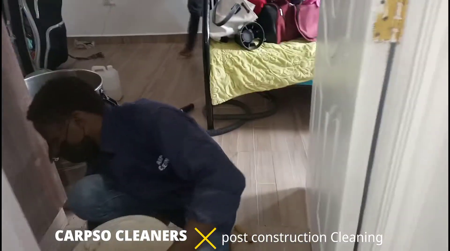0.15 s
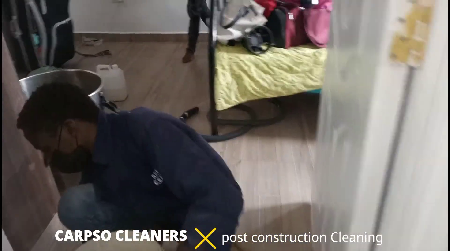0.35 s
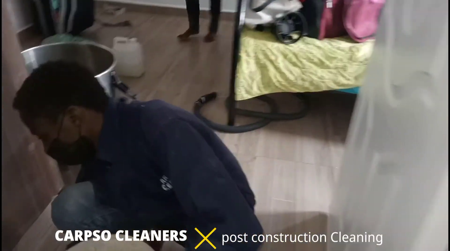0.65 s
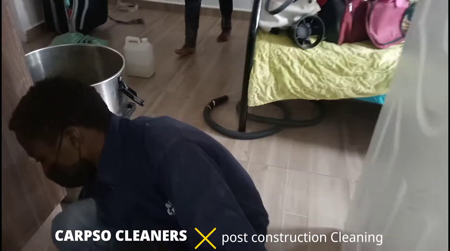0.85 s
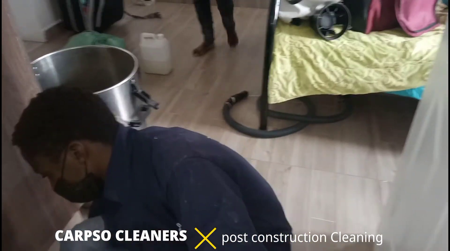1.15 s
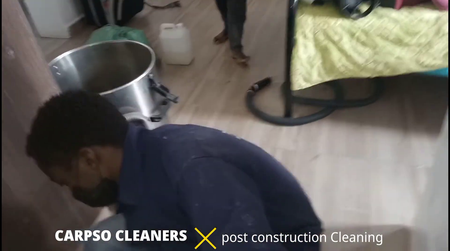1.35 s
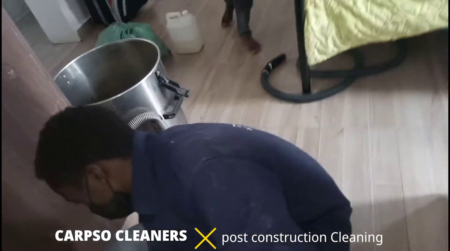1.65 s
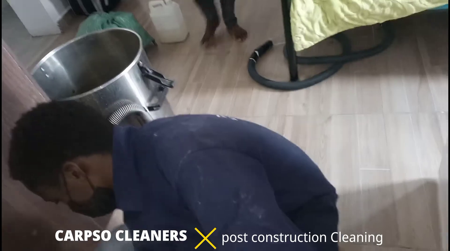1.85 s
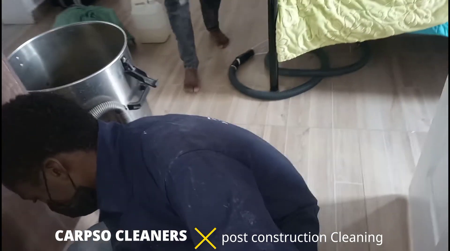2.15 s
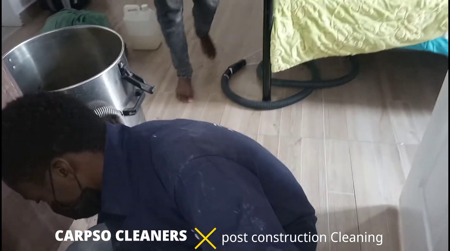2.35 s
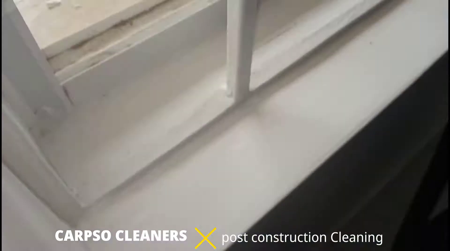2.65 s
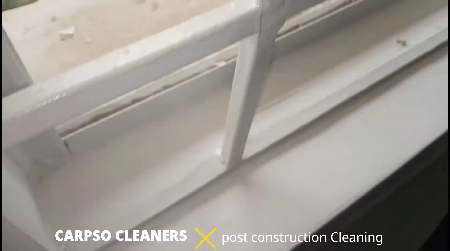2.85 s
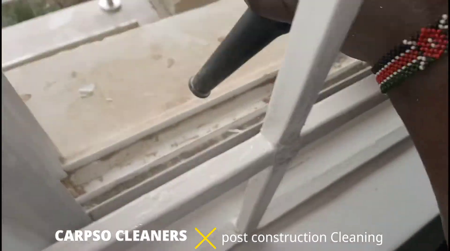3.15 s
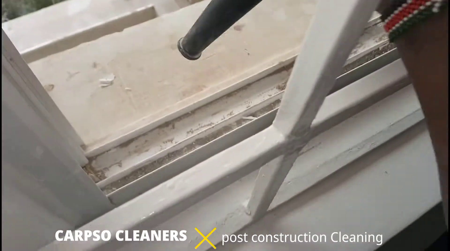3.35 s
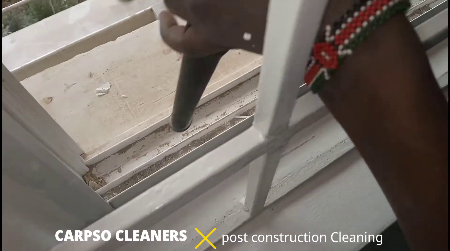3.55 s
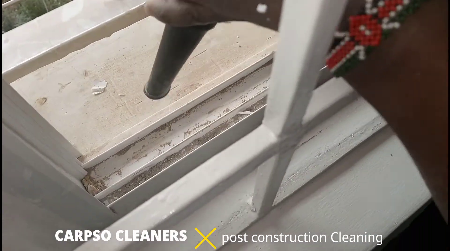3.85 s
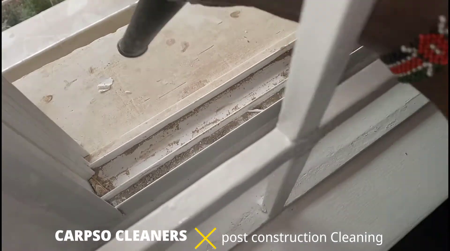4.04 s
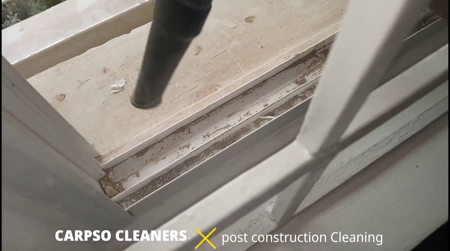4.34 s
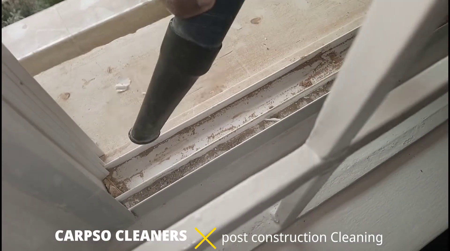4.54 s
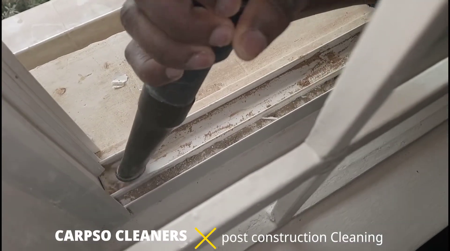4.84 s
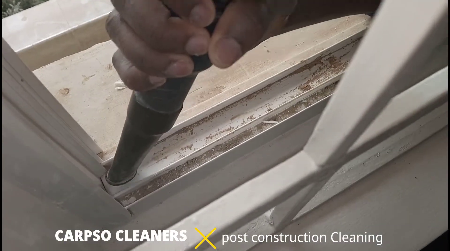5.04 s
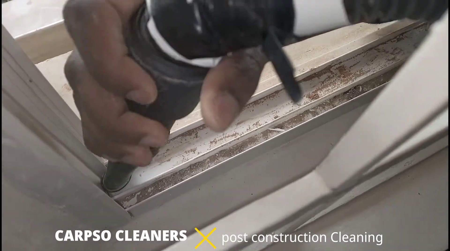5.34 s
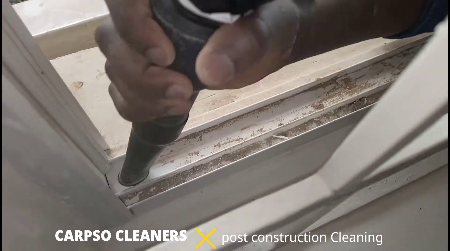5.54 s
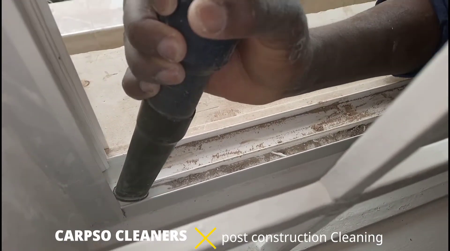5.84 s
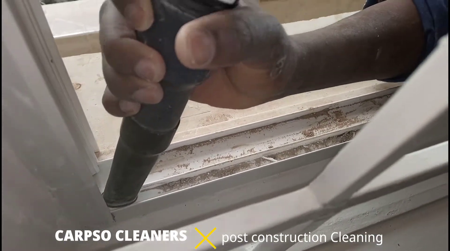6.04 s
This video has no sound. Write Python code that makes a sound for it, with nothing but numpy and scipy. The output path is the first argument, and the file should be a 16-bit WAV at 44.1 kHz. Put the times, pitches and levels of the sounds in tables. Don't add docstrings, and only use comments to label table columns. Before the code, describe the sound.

Faint scrubbing in a hard tiled room, with distant bustle and dull knocks, becomes busier before stopping abruptly. A twin-motor vacuum quickly fades in close by, humming and roaring with rushing air. A bright tick of grit, then a gliding hiss as the nozzle closes on the sill. Pressed into the groove it shrieks airily and the motor sound sinks, then recovers as the seal loosens, before hissing up again.

```python
import sys
import numpy as np
from scipy import signal
from scipy.fft import rfft, irfft
from scipy.io import wavfile
from scipy.ndimage import uniform_filter1d, map_coordinates

SR = 44100
rng = np.random.default_rng(int(sys.argv[2]) if len(sys.argv) > 2 else 0)


def level_to_linear(level):
    exponent = np.asarray(level, float) / 20
    return 10 ** exponent


def inscribe(sig):
    pcm = np.round(np.clip(np.atleast_2d(sig).T, -1, 1) * 32767)
    wavfile.write(sys.argv[1], SR, pcm.astype(np.int16))


N = 272979
T = np.arange(N) / SR
FRAME = 2048
TOP_HZ = 15550


def unit(x):
    return x / np.sqrt(np.mean(x ** 2) + 1e-20)


def curves(rows):
    s, *cols = np.transpose(rows)
    return [np.interp(T, s, c) for c in cols]


def along(points):
    f, level_db = np.transpose(points)
    return lambda hz, s: level_to_linear(np.interp(np.log(hz + 1), np.log(f + 1), level_db))


def bump(hz, centre_hz, width_hz):
    return 1 / (1 + ((hz - centre_hz) / width_hz) ** 2) ** 2


def resonances(hz, modes):
    return sum(level_to_linear(db) * bump(hz, c, w) for c, w, db in modes)


def swell(t, s, length, rise, fall):
    return np.clip((t - s) / rise, 0, 1) * np.exp(-np.clip(t - s - length, 0, None) / fall)


def noise(shape, patchy_db, top_hz=TOP_HZ):
    hz, s, z = signal.stft(rng.standard_normal(N), SR, nperseg=FRAME)
    field = uniform_filter1d(rng.standard_normal(z.shape), size=8, axis=0)
    field = uniform_filter1d(field, size=2, axis=1)
    gain = shape(hz[:, None], s) * level_to_linear(patchy_db * unit(field)) * (hz < top_hz)[:, None]
    return unit(signal.istft(z * gain, SR, nperseg=FRAME)[1][:N])


def wobble(rate):
    return map_coordinates(rng.standard_normal(int(N * rate / SR) + 4), [T * rate])


def ring(s, level_db, hz, t60):
    t = np.clip(T - s, 0, None)
    return level_to_linear(level_db - 60 * t / t60) * np.sin(2 * np.pi * hz * t) * (1 - np.exp(-40 * t / t60))


def narrow(rows, spread_hz, edge_s):
    def gains(t):
        return [level_to_linear(db) * swell(t, s, length, edge_s, edge_s / 2) for s, length, *_, db in rows]

    def shape(hz, t):
        return sum(g * bump(hz, c + glide * (t - s), spread_hz)
                   for g, (s, _, c, glide, _) in zip(gains(t), rows))

    level = np.sqrt(np.mean(np.sum(np.square(gains(T[::64])), axis=0)))
    return level * noise(shape, patchy_db=2.5)


# start_s, speed_turns_per_s
SPEED = [(2.7, 283.0), (2.88, 283.6), (3.0, 284.8), (3.12, 285.3), (3.5, 286.8), (3.62, 286.7),
         (3.75, 284.8), (3.9, 284.0), (4.4, 284.7), (5.1, 286.0), (5.75, 287.7), (6.19, 287.0)]
# start_s, lead_turns_per_s
LEAD = [(2.7, 1.608), (3.3, 4.583), (3.9, 5.978), (6.19, 6.01)]
# shaft_multiple, level_db
ORDERS_A = [(1, -1.5), (2, -18), (4, -18)]
ORDERS_B = [(1, -2), (1.5, -21), (2, -20), (4, -27)]
# start_s, first_db, second_db
BLADES = [(2.72, -34, -38), (3.06, -33.5, -37), (3.3, -34.5, -35), (3.6, -34.5, -47), (3.9, -32.5, -35),
          (4.25, -31, -43), (4.42, -32, -34), (4.8, -34, -36), (4.97, -31, -42), (5.05, -35.5, -50),
          (5.69, -31, -38), (5.9, -30, -33), (6.19, -29.5, -31)]
# pitch_hz, level_db
CASING = [(15, -75), (25, -45), (53, -47), (107, -18), (229, -10), (257, -13.5), (284, -4), (309, -2.5),
          (346, -6.5), (569, -11.5), (741, -26), (1070, -15), (1300, -10.5), (1690, -56), (2860, -120)]
# pitch_hz, width_hz, over_roar_db
CASING_MODES = [(119.5, 16.8, 8.5), (187, 16.2, 6.5), (260, 13.5, 7), (442, 13.4, 5.5), (574, 13, 6)]
# start_s, seal_0_to_1, low_whistle_tilt_db
SEAL = [(4.9, 0, 8.5), (4.99, 0.33, -1.5), (5.05, 0.44, -1), (5.16, 0.62, -3), (5.25, 0.83, 1.5),
        (5.35, 0.93, -0.3), (5.45, 0.88, -3.5), (5.56, 0.84, -0.9), (5.62, 0.63, 1), (5.69, 0.12, 0.5),
        (6.0, 0.32, -1.5), (6.19, 0.6, -0.9)]
DUCKED_DB = dict(roar=14.5, hum=12, blade_a=6, blade_b=14, duct=4, rush=1.5)


def motors():
    hum_db, roar_db = -29, -36.5 + 4.5
    seal = curves(SEAL)[0]
    first = np.cumsum(curves(SPEED)[0]) / SR
    ahead = .5 + np.cumsum(curves(LEAD)[0] * (T > LEAD[0][0])) / SR
    second = first + ahead

    def tone(turns, k, level_db):
        phase = 2 * np.pi * k * turns + .06 * k * wobble(8)
        return np.sqrt(2) * level_to_linear(level_db + 1.1 * wobble(12)) * np.sin(phase)

    def drum(hz, t):
        return along(CASING)(hz, t) * (1 + resonances(hz, CASING_MODES))

    hum = sum(tone(first, k, db) for k, db in ORDERS_A)
    hum += sum(tone(second, k, db) for k, db in ORDERS_B)
    blade_a_db, blade_b_db = curves(BLADES)
    blades = tone(first, 6, blade_a_db - DUCKED_DB["blade_a"] * seal)
    blades += tone(second, 6, blade_b_db - DUCKED_DB["blade_b"] * seal - 1.3 * wobble(9))
    roar = level_to_linear(roar_db - DUCKED_DB["roar"] * seal) * noise(drum, patchy_db=1.5)
    return level_to_linear(hum_db - DUCKED_DB["hum"] * seal) * hum + blades + roar


# pitch_hz, level_db
DUCT = [(290, -22), (500, -9), (570, -4), (733, -6.5), (1460, -5.5), (1720, -7), (1900, -11.5), (3500, -10),
        (4550, -10), (7700, -120)]
RUSH = [(1060, -26.5), (1800, -3.5), (1840, -2), (2830, -7), (3320, -2.5), (3720, -15), (4150, -5.5),
        (6470, 0), (7810, -12), (9000, -14), (11700, -28), (19800, -120)]
FIZZ = [(4120, -43), (7000, -1), (8040, -11.5), (9220, -3.5), (10200, -4.5), (13400, -16), (14700, -6.5),
        (15400, -6.5)]
# start_s, length_s, pitch_hz, glide_hz_per_s, level_db
GAP = [
    (2.7, 1.3, 4530, -250, -41),
    (4.05, 0.78, 4100, 2249, -28.5),
    (5.7, .6, 4140, 2650, -25),
]
# start_s, length_s, pitch_hz, glide_hz_per_s, level_db
WHISTLES = [(5.06, .14, 6150, 300, -29), (5.1, .1, 4040, -200, -30), (5.19, .1, 4010, -40, -21),
            (5.21, .37, 3300, -220, -25), (5.33, .22, 6500, 900, -25), (5.37, .22, 4380, -1100, -27),
            (5.76, .5, 6530, 150, -29)]
# pitch_hz, width_hz, level_db
GROOVE_MODES = [
    [(3540, 660, -5.5), (4110, 960, 5.5)],
    [(6220, 1600, -5.5), (6790, 1100, -2.5), (8630, 950, -11.5)],
]


def suction():
    near_from_s, nearest_s = 3.73, 4.7
    seal, tilt_db = curves(SEAL)
    gust_db = 0.45 * wobble(14)

    duct_db = -36 + 3.0 + 2.5 * np.maximum(T - near_from_s, 0) + 1.3 * wobble(7)
    duct_db -= (DUCKED_DB["duct"] + .8 * tilt_db) * seal
    rush_db = -32 + 8.5 - DUCKED_DB["rush"] * seal + gust_db
    nearing_s = np.clip(T, near_from_s, nearest_s) - near_from_s
    fizz_db = -34 + 6.5 * seal + 1.7 * nearing_s + gust_db + 0.78 * wobble(9)

    air = level_to_linear(duct_db) * noise(along(DUCT), patchy_db=1.0)
    air += level_to_linear(rush_db) * noise(along(RUSH), patchy_db=1.83)
    air += level_to_linear(fizz_db) * noise(along(FIZZ), patchy_db=2.6)
    air += narrow(GAP, spread_hz=990, edge_s=.15)
    air += narrow(WHISTLES, spread_hz=120, edge_s=0.036)

    groove_db = -39 + 20.5 * np.sqrt(np.clip(seal, 0, 1))
    for level_db, modes in zip((groove_db + tilt_db, groove_db - tilt_db), GROOVE_MODES):
        whistle = noise(lambda hz, t: resonances(hz, modes), patchy_db=1.9)
        air += level_to_linear(level_db + 1.15 * wobble(60)) * whistle
    return air


# start_s, crack_db, t60_s
SNAP = (3.0068, -10, .006)
# pitch_hz, level_db
SNAP_MODES = [(4600, -12), (6500, -6), (8000, -10), (11000, -19), (14500, -12)]
# centre_s, peak_db, pitch_hz, half_width_s
BUMP = (4.9661, -13.5, 310, .0012)


def knocks():
    s, crack_db, t60 = SNAP
    decay = (T >= s) * level_to_linear(crack_db - 60 * np.clip(T - s, 0, 1) / t60)
    crack = decay * noise(lambda hz, t: hz > 1500, patchy_db=1, top_hz=16200)
    snap = crack + sum(ring(s, db, hz, t60) for hz, db in SNAP_MODES)
    s, push_db, hz, width = BUMP
    push = np.sin(2 * np.pi * hz * (T - s)) * np.exp(-((T - s) / width) ** 2 / 2)
    return snap + level_to_linear(push_db) * push


# start_s, bristle_db, wash_db, rise_s, fall_s
SCUFF = (1.732, -47, -53, .012, .045)


def scuff():
    s, _, _, rise, fall = SCUFF
    return swell(T, s, rise, rise, fall)


# start_s, length_s, end_db, top_over_bristle_db
STROKES = [(-.05, 0.096, -60, -15), (0.107, 0.11, -57.5, -3), (0.334, 0.042, -68, -14),
           (0.495, 0.13, -59.5, -6), (0.69, 0.088, -60.5, -5), (0.834, 0.088, -57, -3),
           (0.984, 0.066, -61.5, -5), (1.09, 0.061, -59, 1), (1.128, 0.21, -53, -8.5),
           (1.474, 0.2, -49.5, -5), (1.753, .08, -56, -6), (1.862, .085, -49.5, -8.5),
           (1.965, .09, -49.5, -7), (2.035, 0.43, -46, -7), (2.51, .1, -48, -3), (2.624, .1, -46.5, 0)]
# pitch_hz, level_db
BRISTLE = [(1470, -19.5), (2500, -18), (3670, -6), (4470, -2.5), (5470, 0), (8020, -7), (10000, -12.5),
           (13000, -31), (22000, -120)]
BRISTLE_TOP = [(4710, -42), (8000, -22), (9890, -2.5), (13400, -11), (13800, -10), (14800, 1.5), (15400, 2)]


def scrubbing():
    rise_share, fall_s, swell_db_per_s = 0.49, 0.051, 9
    rest_db, rest_top_db = -69, -11
    bristle = level_to_linear(rest_db) + level_to_linear(SCUFF[1]) * scuff()
    top = level_to_linear(rest_db + rest_top_db)
    for s, length, end_db, top_db in STROKES:
        press = level_to_linear(end_db + swell_db_per_s * np.clip(T - s - length, -1, 0))
        press = press * swell(T, s, length, rise_share * length, fall_s)
        bristle = bristle + press
        top = top + level_to_linear(top_db) * press
    brush = bristle * noise(along(BRISTLE), patchy_db=3.0)
    brush += top * noise(along(BRISTLE_TOP), patchy_db=-1.0)
    return level_to_linear(0.89 * wobble(30.3)) * brush


# start_s, level_db
HOUSE = [(0, -62), (.28, -63), (.39, -58), (.9, -61.5), (1.15, -61.5), (1.45, -61.5), (1.52, -58.5),
         (1.95, -56), (2.36, -45), (2.68, -48)]
# peak_s, level_db
STEPS = [(.17, -71), (.3, -67), (.39, -66), (.48, -72), (.62, -73), (.74, -70), (.85, -70), (1.02, -73),
         (1.12, -70), (1.24, -62), (1.38, -69), (1.68, -66), (1.9, -72), (2.05, -72), (2.4, -78)]
# start_s, length_s, level_db
BOOMS = [(.17, .06, -79), (0.297, 0.28, -70), (.7, 0.11, -78), (0.974, 0.25, -75), (1.36, 0.099, -83),
         (1.957, 0.17, -64), (2.152, 0.2, -60.5), (2.31, .14, -55), (2.454, 0.17, -59.5)]
# pitch_hz, level_db
WASH = [(470, -59), (960, -25), (1170, -5), (1310, -4.5), (1520, -4), (2320, -1.5), (2670, -2),
        (5000, -8.5), (6500, -47), (11000, -120)]
RUMBLE = [(15, -47), (25, -7), (59, -1), (146, 1), (229, -14), (291, -13), (413, -26), (450, -12),
          (580, -48), (990, -120)]
BOOM = [(150, -38), (250, -10), (334, -3), (443, -18), (614, -2.5), (743, -11.5), (893, 1.5), (1200, -4),
        (1560, -31), (2640, -120)]
# start_s, length_s, pitch_hz, glide_hz_per_s, level_db
HOLLOW = [(1.05, .18, 316, 52, -65.5), (1.34, .08, 335, 10, -74), (1.47, .26, 338, 70, -67.5),
          (1.76, 0.25, 362, 120, -67)]
# start_s, length_s, pitch_hz, glide_hz_per_s, level_db
FAR_WHINE = [
    (-.05, 0.46, 1983, -10, -65.5),
    (.42, .2, 1960, -10, -77),
]
# start_s, level_db, pitch_hz, t60_s
THUDS = [(1.21, -53, 196, 0.21), (1.83, -60, 583, 0.36), (1.869, -56, 140, 0.49), (2.33, -52, 231, 0.52),
         (2.34, -51.5, 600, 0.54)]


def house():
    step_s, boom_rise_s, boom_fall_s = 0.056, 0.034, 0.066
    wash = level_to_linear(curves(HOUSE)[0]) + level_to_linear(SCUFF[2]) * scuff()
    rumble = level_to_linear(-79) + sum(level_to_linear(db) * np.exp(-((T - s) / step_s) ** 2) for s, db in STEPS)
    boom = level_to_linear(-85) + sum(level_to_linear(db) * swell(T, s, length, boom_rise_s, boom_fall_s)
                          for s, length, db in BOOMS)
    room = wash * noise(along(WASH), patchy_db=1.5)
    room += rumble * noise(along(RUMBLE), patchy_db=4.0)
    room += boom * noise(along(BOOM), patchy_db=2.5)
    room += narrow(HOLLOW, spread_hz=37, edge_s=0.051)
    room += narrow(FAR_WHINE, spread_hz=21, edge_s=.04)
    return room + sum(ring(*hit) for hit in THUDS)


# silence_from_s, fade_from_s, fade_to_s
CUT = (2.685, 2.708, 3.0)
# start_s, gain_db
DUCK = [
    (2.985, 0),
    (3.003, -10),
    (3.025, -9.5),
    (3.05, 0),
]
# start_s, gain_db
PUMP = [(4.95, 0.5), (4.99, 1.8), (5.04, -0.5), (5.1, 0.5), (5.55, 1), (5.6, -2.5), (5.66, 0.5),
        (5.72, 1.5), (5.85, -0.4)]


def scene():
    stop, start, full = CUT
    fade = 0.93 * np.clip((T - start) / (full - start), 0, 1)
    fade += 0.062 * np.clip((T - start) / 0.0011, 0, 1)
    gain = level_to_linear(curves(DUCK)[0] + curves(PUMP)[0]) * fade
    vacuum = (motors() + suction()) * gain
    before = (scrubbing() + house()) * np.clip((stop - T) / .001, 0, 1)
    mono = before + vacuum + knocks()
    return np.array([mono, mono])


# centre_s, centre_hz
SPLITS = [(.403, 9900), (2.47, 7200), (2.515, 6900), (2.515, 11800), (3.12, 6200), (3.353, 12800),
          (3.376, 11800), (3.376, 4900), (3.468, 4600), (3.468, 8900), (4.442, 5700), (4.442, 7600),
          (5.373, 5400), (5.698, 6500), (5.698, 13700)]


def split_bands(mono):
    side = np.zeros(N)
    hz = np.fft.rfftfreq(FRAME, 1 / SR)
    for s, centre_hz in SPLITS:
        at = slice(round(s * SR) - FRAME // 2, round(s * SR) + FRAME // 2)
        width_hz = 600 + .08 * centre_hz
        inside = np.abs(hz - centre_hz) < width_hz / 2
        random_phase = np.exp(2j * np.pi * rng.random(len(hz)))
        band = np.abs(rfft(mono[at])) * inside * random_phase
        side[at] += level_to_linear(-0.5) * irfft(band) * np.hanning(FRAME)
    return side


def band_limit(x):
    return signal.sosfilt(signal.butter(12, 16810, fs=SR, output="sos"), x)


def record(dry):
    highpass = signal.butter(2, 55, "highpass", fs=SR, output="sos")
    heard = signal.sosfilt(highpass, dry)
    mix = heard + split_bands(heard[0]) * [[1], [-1]]
    return band_limit(mix)


dry = scene()
out = record(dry)
inscribe(out)
```